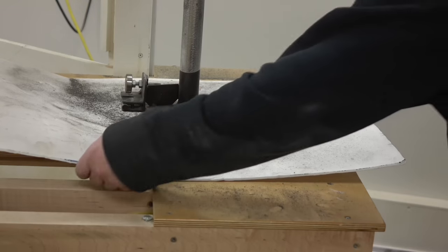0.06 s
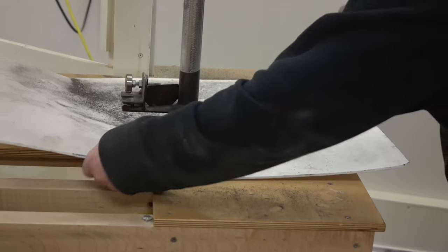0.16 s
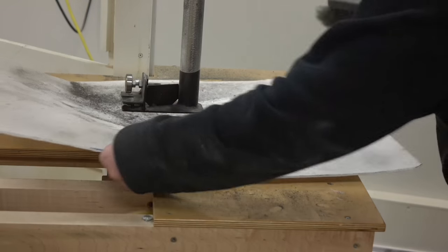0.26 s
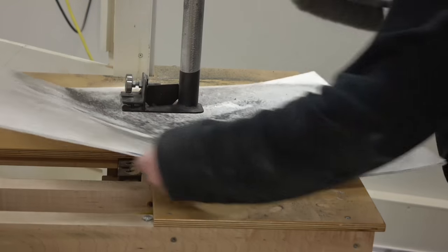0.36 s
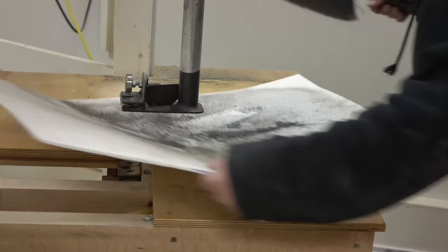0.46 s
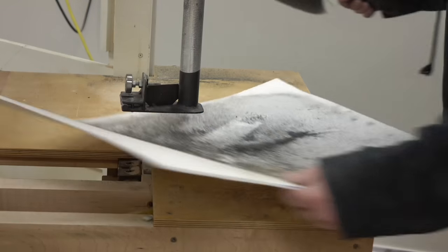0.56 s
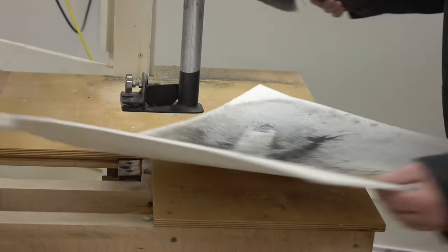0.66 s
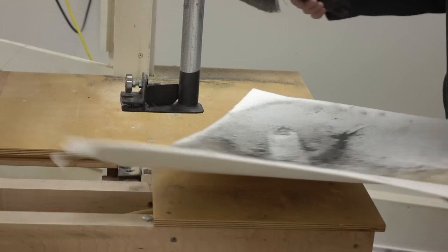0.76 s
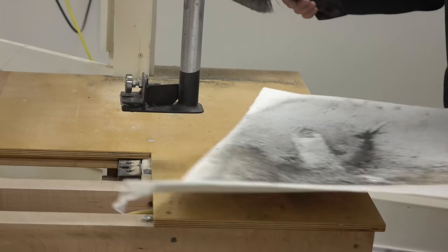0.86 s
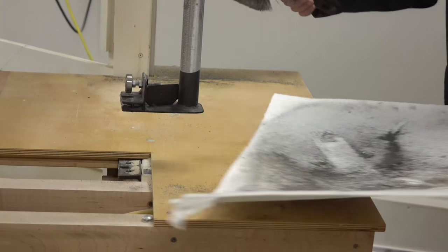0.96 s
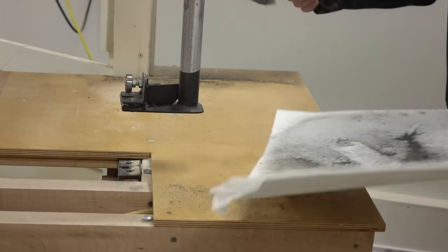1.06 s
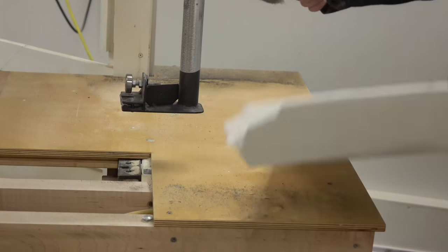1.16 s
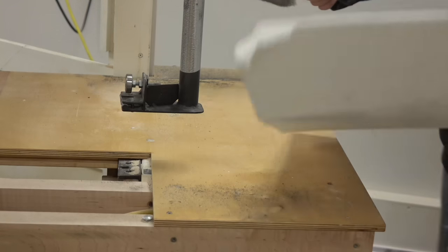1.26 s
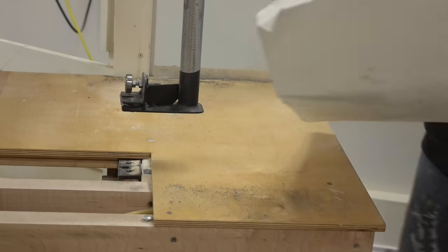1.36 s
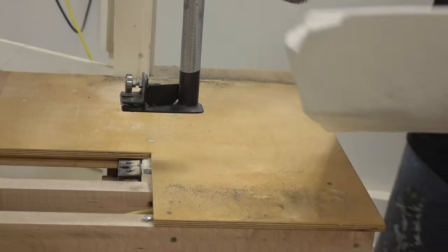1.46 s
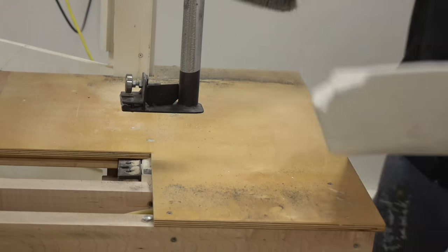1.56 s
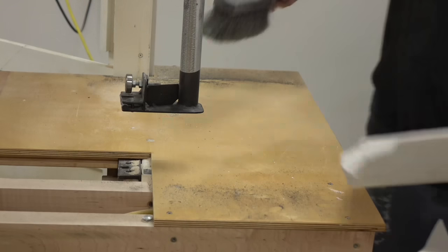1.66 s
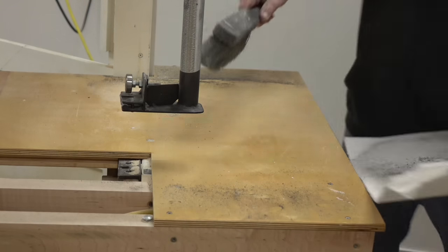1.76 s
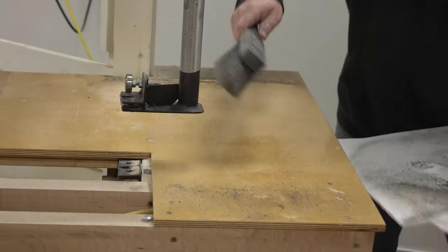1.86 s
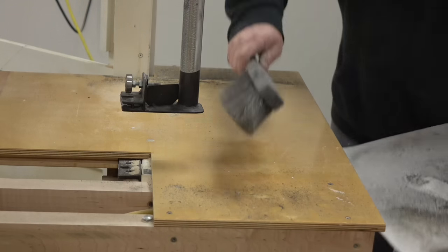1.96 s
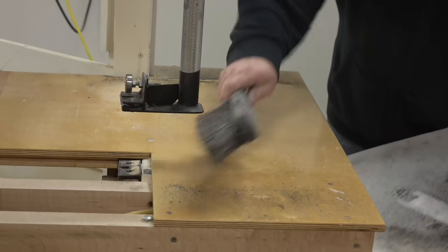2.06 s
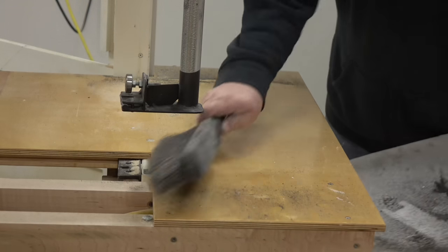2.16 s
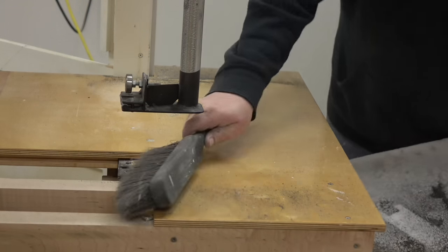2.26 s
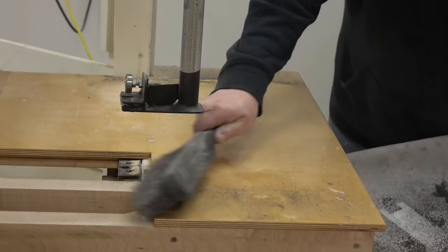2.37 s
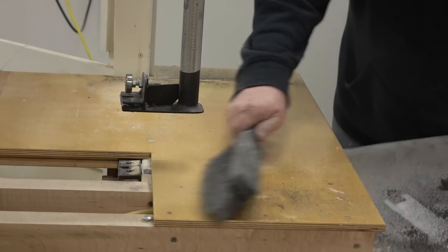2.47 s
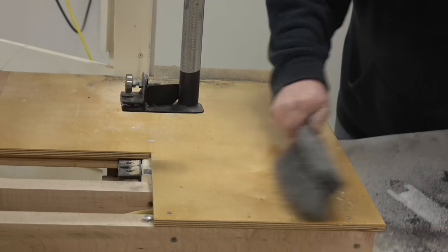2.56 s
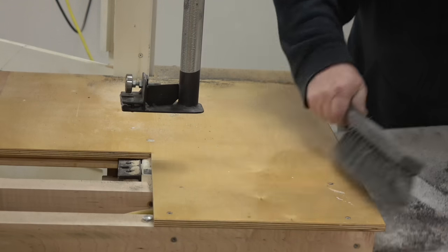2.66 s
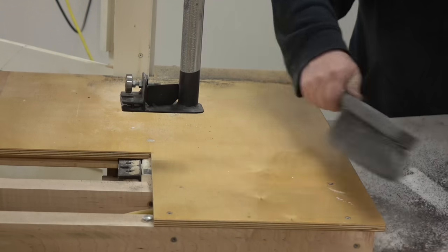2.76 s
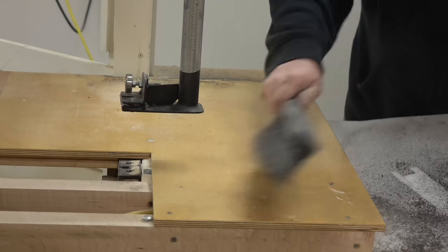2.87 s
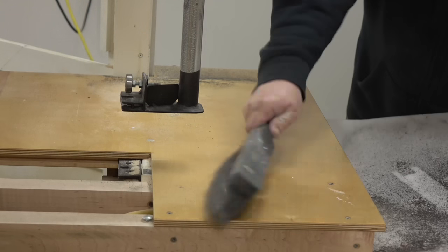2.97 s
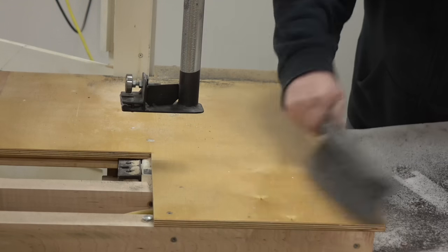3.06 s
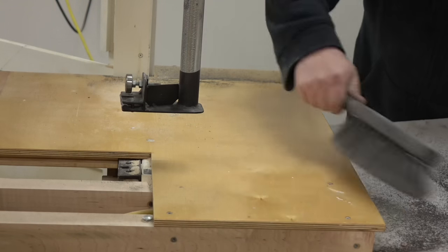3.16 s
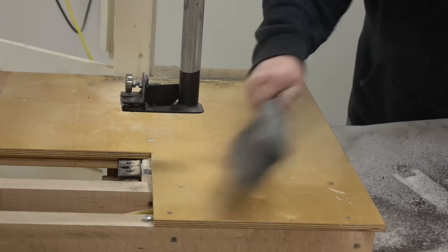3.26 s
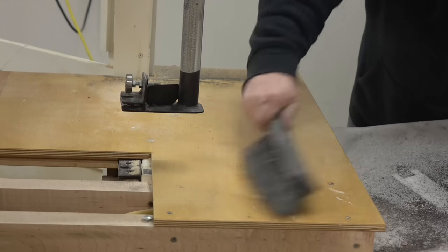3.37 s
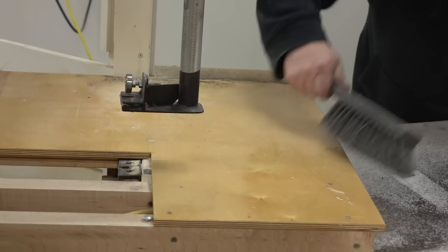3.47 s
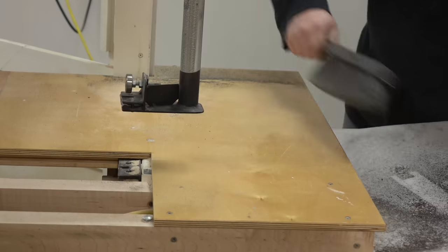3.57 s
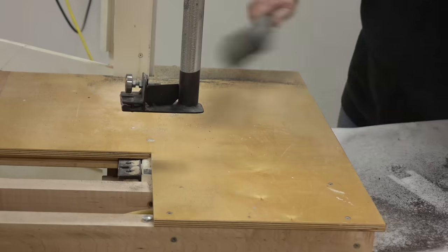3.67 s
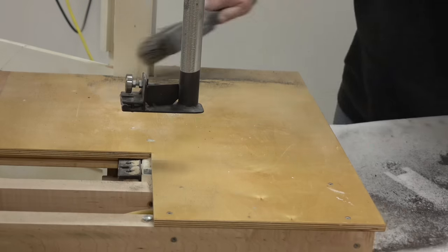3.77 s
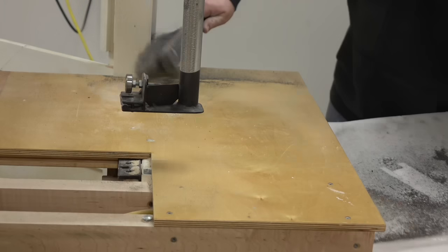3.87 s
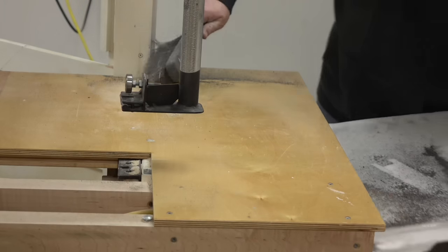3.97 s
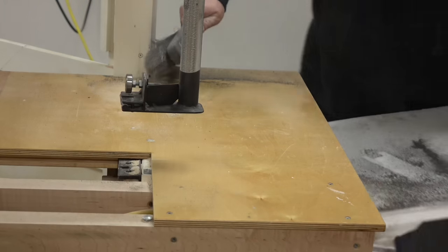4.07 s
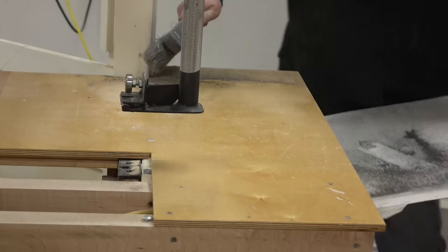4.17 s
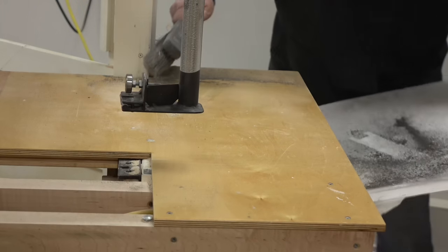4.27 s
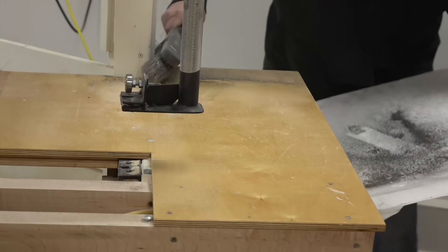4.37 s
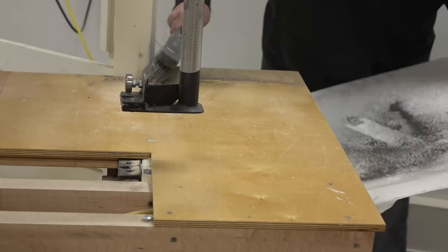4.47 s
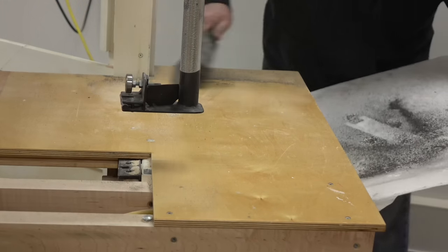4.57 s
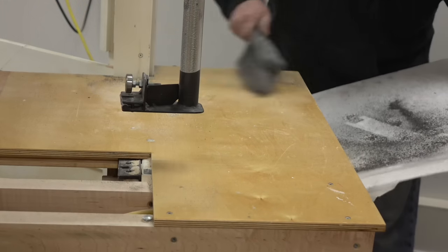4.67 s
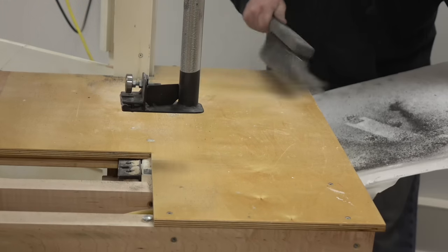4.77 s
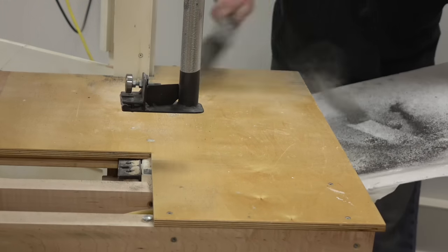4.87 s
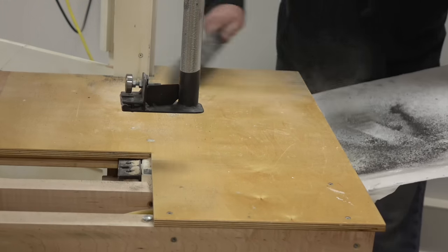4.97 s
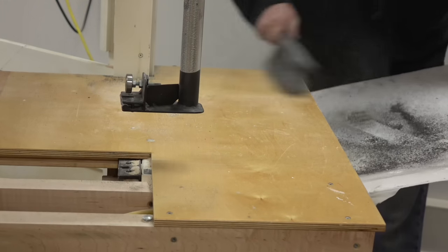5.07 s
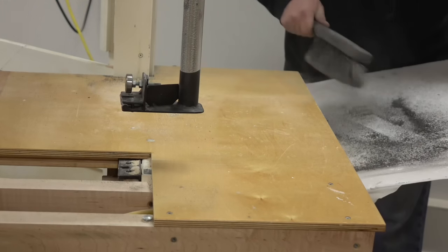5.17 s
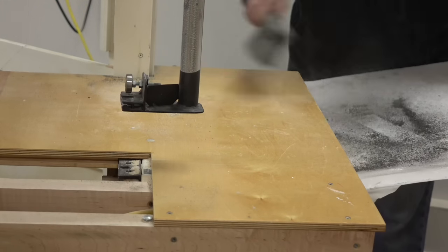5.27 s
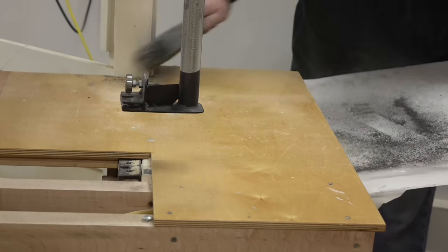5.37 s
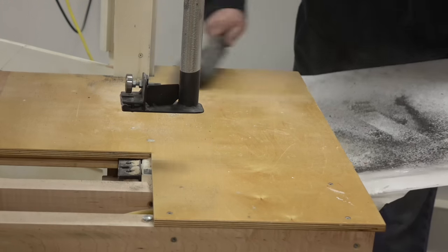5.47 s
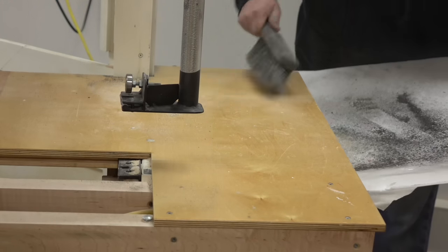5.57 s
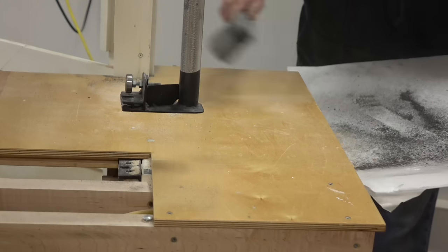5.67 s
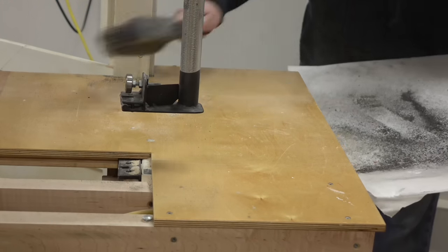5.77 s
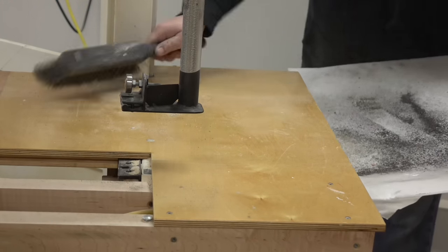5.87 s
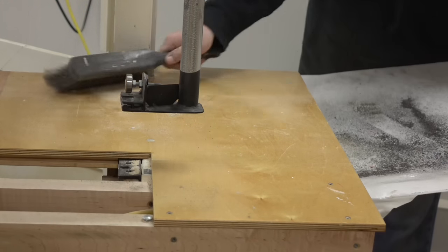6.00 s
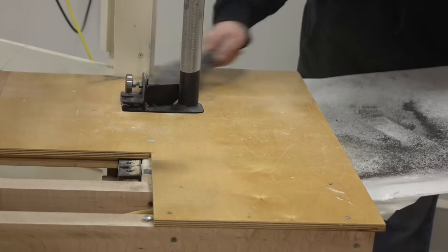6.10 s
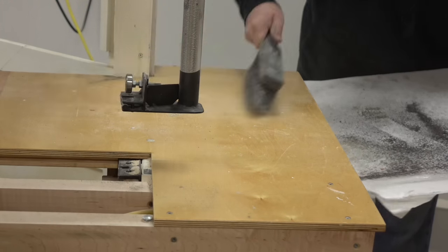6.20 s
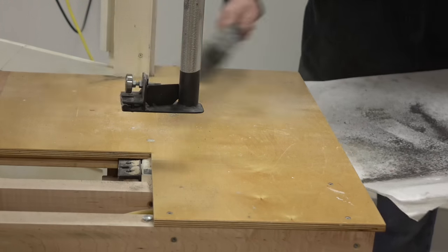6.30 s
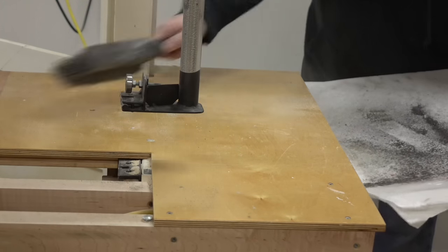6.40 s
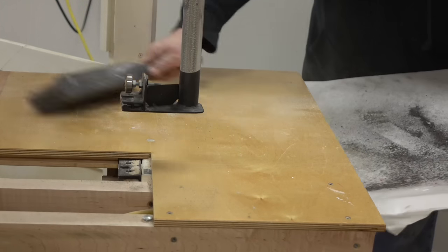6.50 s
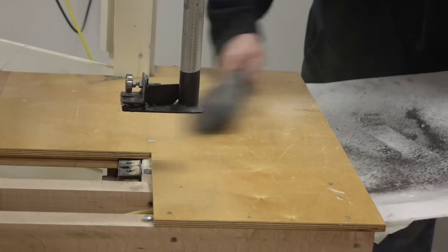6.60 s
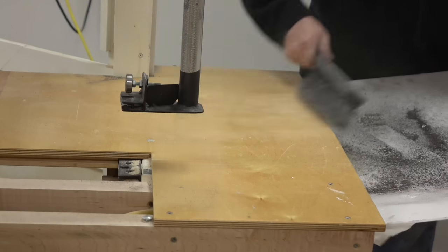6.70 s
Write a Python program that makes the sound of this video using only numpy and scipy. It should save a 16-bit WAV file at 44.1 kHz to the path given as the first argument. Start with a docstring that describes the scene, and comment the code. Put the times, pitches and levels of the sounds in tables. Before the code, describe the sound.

Heavy paper slides and flexes over gritty wood, its edge chattering and popping, with low floppy wobbles. After a brief faint hollow hiss and a loud rasp as it is put aside, a bristle brush lands with a dull knock and strokes the tabletop: airy swishes, scratchy scrapes, tiny grit clicks and wooden taps. Close centred pickup, little reverberation, quiet room air.

```python
"""A stiff charcoal drawing hisses, rasps and snaps as it is dragged off a wooden work table, flopping low.
It is laid aside under a faint hollow hiss; then a hand brush lands, sweeps dust and grit, and shakes the board.
Rubbing is random stick-slip impulses through spectra and wood modes, shaped by the force of each move.
Snaps and clicks are short filtered noise, flops are sagging notes with a rebound, scuffs are gliding noise bands.
A small workshop adds a short tail and quiet air; both channels are alike."""
import sys
import numpy as np
from scipy import signal
from scipy.fft import rfft, irfft, next_fast_len
from scipy.io import wavfile
from scipy.ndimage import uniform_filter1d, map_coordinates

SR = 44100
rng = np.random.default_rng(int(sys.argv[2]) if len(sys.argv) > 2 else 0)


def int16_out(signal):
    """Quantize to a 16-bit WAV file."""
    q = np.round(np.clip(np.atleast_2d(signal).T, -1, 1) * 32767)
    wavfile.write(sys.argv[1], SR, q.astype(np.int16))


N = 297234  # samples

# Levels in the tables are nominal: layer trims come on top.
# pulls of the sheet: start t/s, rise t/s, hold t/s, release t/s per 20 dB,
# hiss level/dB, rasp level/dB, drumming level/dB, treble offset level/dB
SHEET_PULLS = [ (0.009, 0.0074, 0.018, 0.07, -43, -49, -60.5, 1),
               (0.049, 0.0109, 0.0395, 0.21, -45.5, -46, -60.5, 3.5),
               (0.208, 0.0542, 0.143, 2.58, -41.5, -44, -62, 6.5),
               (0.45, 0.097, 0.226, 0.6557, -45, -44.5, -48, -4.5),
               (0.785, 0.0506, 0.0283, 0.1685, -40.5, -40.5, -51.5, 1.5),
               (0.971, 0.008, 0.012, 0.06, -50, -48, -75, -10),
               (1.011, 0.0652, 0.0578, 0.11, -35.5, -35.5, -41, -7),
               (1.269, 0.049, 0.0267, 0.11, -47.5, -53.5, -65.5, -22),
               (1.59, 0.035, 0.01, 0.05, -61, -66, -64, -8),
               (1.615, 0.0268, 0.057, 0.37, -49.5, -50, -47.5, -6),
               (1.727, 0.0457, 0.0132, 0.07, -46, -43.5, -41, 0),
               (1.909, 0.013, 0.046, 0.0066, -40, -42.5, -48.5, 1),
               (1.937, 0.0498, 0.0226, 0.1323, -32, -31, -38, -3.5)]
# pushes of the brush: start t/s, rise t/s, hold t/s, release t/s per 20 dB,
# bristle hiss level/dB, scrape level/dB, board level/dB, treble offset level/dB
BRUSH_PUSHES = [ (2.139, 0.0128, 0.1096, 0.4, -47.5, -52.5, -58, 1),
                (2.386, 0.025, 0.015, 0.35, -50, -50, -78, 0),
                (2.47, 0.074, 0.07, 0.24, -44.5, -46, -55.5, 1),
                (2.691, 0.012, 0.057, 0.1166, -52.5, -52, -48, 1),
                (2.782, 0.0204, 0.08, 0.62, -55, -66.5, -84.5, -3.5),
                (2.947, 0.0046, 0.167, 0.14, -51, -60, -73.5, 3),
                (3.321, 0.0064, 0.0445, 0.29, -49.5, -55.5, -83.5, 1),
                (3.56, 0.091, 0.02, 0.15, -58.5, -72, -68, -24),
                (3.655, 0.015, 0.012, 0.12, -61, -68, -68, -4),
                (3.81, 0.01355, 0.0178, 0.14, -49, -55, -78, 3.5),
                (3.91, 0.0475, 0.0102, 0.32, -47.5, -46.5, -60.5, 1),
                (3.97, 0.0153, 0.0292, 0.23, -44.5, -42.5, -58.5, 0.5),
                (4.04, 0.0402, 0.043, 0.11, -49, -58, -57.5, 9.5),
                (4.17, 0.041, 0.046, 1.5, -52, -54.5, -67, -2),
                (4.26, 0.0317, 0.1026, 0.08, -45.5, -49, -51.5, 2.5),
                (4.403, 0.022, 0.0441, 0.17, -38, -39, -38.5, -1.5),
                (4.553, 0.0608, 0.1203, 0.0358, -50.5, -53, -65, 2.5),
                (4.776, 0.004, 0.031, 0.75, -72.5, -57, -63.5, -12.5),
                (4.862, 0.05, 0.141, 0.25, -46.5, -50.5, -61.5, 0.5),
                (5.018, 0.0524, 0.097, 0.14, -46.5, -46.5, -51, -1.5),
                (5.15, 0.015, 0.0466, 0.13, -54.5, -44.5, -40, -8),
                (5.239, 0.0194, 0.019, 0.41, -59, -56.5, -50, -5),
                (5.347, 0.0607, 0.0093, 0.29, -46, -46.5, -44, 4.5),
                (5.459, 0.0355, 0.0668, 0.14, -44, -49, -46.5, 1.5),
                (5.66, 0.02, 0.012, 0.07, -55, -63, -53, 1),
                (5.798, 0.004, 0.125, 0.6, -58, -84.5, -82, -4),
                (5.897, 0.0092, 0.0253, 0.07, -46.5, -47.5, -61.5, 4),
                (5.955, 0.06, 0.19, 0.08, -50.5, -57, -84, 2),
                (6.349, 0.0037, 0.0697, 0.18, -57.5, -72, -70.5, -10.5),
                (6.457, 0.0073, 0.0085, 0.2, -47.5, -45, -51.5, 3),
                (6.541, 0.018, .16, 3.5, -48, -52.5, -60, 3)]
# the sheet's edge catches and snaps: t/s, peak level/dB, pitch f/Hz, t60 t/s
EDGE_CATCHES = [(0.032, -37, 838, 0.043), (0.075, -36.5, 790, 0.054), (0.101, -34, 2260, 0.044),
                (0.306, -33.5, 1353, 0.044), (0.408, -33, 1450, 0.051), (0.418, -31.5, 1450, 0.0266),
                (0.444, -33, 1250, 0.035), (0.475, -27.5, 1354, 0.0427), (0.490, -32, 1400, 0.057),
                (0.518, -31.5, 1270, 0.027), (0.532, -21, 1262, 0.015), (0.554, -22, 1205, 0.031),
                (0.558, -21.5, 1105, .03), (0.569, -25.5, 1420, 0.036), (0.584, -29, 2000, 0.035),
                (0.634, -23.5, 943, 0.047), (0.643, -26.5, 1050, 0.036), (0.706, -30, 980, 0.026),
                (0.738, -32.5, 900, 0.0242), (0.835, -29.5, 3880, 0.0275), (0.981, -38, 3800, 0.02),
                (1.0, -37, 2200, 0.014), (1.011, -36, 4500, 0.025), (1.017, -34, 1200, 0.04),
                (1.278, -40.5, 1640, 0.019), (1.636, -33, 701, 0.079)]
# the brush meets the table: t/s, level/dB, most excited f/Hz, ring level/dB, fall to -60 dB t/s
BRUSH_LANDINGS = [(2.236, -55, 1130, 4, 0.04), (2.696, -50, 1162, 6.5, 0.036), (2.947, -42, 1160, -8, 0.06),
                  (3.32, -41, 1233, -3.5, 0.05), (3.86, -50.5, 1130, 4.5, 0.0313),
                  (4.401, -41, 532, 7, 0.125), (4.937, -40.5, 1133, 1, 0.057), (5.404, -43, 588, 5, 0.035),
                  (5.904, -45, 766, 4, 0.075), (6.354, -53.5, 970, 11, 0.0186),
                  (6.459, -41.5, 1362, -3, 0.073)]
# grit and bristle tips click and scratch: t/s, peak level/dB, pitch f/Hz, t60 t/s
GRIT_TICKS = [(2.143, -37, 6000, .012), (2.396, -41, 1550, .012), (2.697, -38, 1400, .01),
              (2.7315, -29, 1600, 0.008), (2.876, -41.5, 3020, 0.0076), (3.035, -35.5, 4500, 0.0064),
              (3.127, -39, 2740, 0.0125), (3.238, -46.5, 3600, 0.006), (3.992, -33, 4000, 0.0055),
              (4.784, -39.5, 1500, 0.012), (4.802, -44, 1300, .012), (5.259, -40, 1110, 0.014),
              (5.349, -42.5, 2000, 0.0146), (5.407, -33, 2520, 0.0105), (5.479, -38.5, 1117, 0.0099),
              (5.8015, -43, 5200, 0.015), (6.354, -44.5, 3170, 0.034), (6.589, -32.5, 3970, 0.054)]
# dull flops of sheet and table: t/s, level/dB, starting pitch f/Hz, t60 t/s
PANEL_FLOPS = [(0.02, -50, 145, 0.122), (0.06, -52, 125, 0.2), (0.17, -53, 320, 0.15),
               (0.262, -46.5, 314.4, 0.29), (0.299, -41.5, 309.6, 0.198), (0.411, -46, 329, 0.165),
               (0.555, -41, 250, 0.08), (1.628, -41.5, 290.6, 0.103), (1.687, -47, 134, 0.083),
               (2.14, -44, 370, 0.12), (2.194, -36.5, 81.2, 0.077), (2.241, -22.5, 135, 0.04),
               (2.247, -32, 340, 0.12), (2.285, -32.5, 205, 0.0735), (2.301, -37.5, 93.4, 0.14),
               (2.32, -41, 300, 0.13), (2.386, -45, 130, 0.06), (2.42, -40.5, 322.7, 0.06),
               (2.484, -44, 330, 0.1), (2.696, -38, 400, 0.09), (2.7, -42, 165, 0.3),
               (2.733, -40, 400, 0.08), (3.665, -52, 330, 0.11), (4.265, -28, 136, 0.0704),
               (4.402, -19, 480, 0.028), (4.406, -34, 160, 0.08), (4.94, -40.5, 320, 0.16),
               (5.403, -38, 280, 0.067), (5.405, -42, 150, .08), (5.49, -42.5, 163.7, 0.125),
               (5.931, -54, 335.3, 0.26), (6.473, -39, 339.5, 0.155), (6.627, -39.5, 315, 0.179),
               (6.645, -38.5, 190, 0.19), (6.697, -45, 83.8, 0.143), (6.712, -46, 335, 0.16)]
# pitched scuffs of sheet or bristles: start t/s, length t/s, level/dB, from f/Hz, to f/Hz, width f/Hz
DRAG_SCUFFS = [(0.9995, 0.0055, -37, 3900, 3850, 600), (1.015, 0.012, -44, 2055, 1988, 400),
               (1.016, 0.012, -43, 4020, 4000, 500), (1.28, 0.15, -62, 500.1, 477.9, 80),
               (1.91, 0.0483, -44, 520.4, 660, 220), (1.955, 0.055, -41.5, 640, 700, 300),
               (2.517, 0.125, -55.5, 800, 770, 110), (2.515, 0.085, -54, 1000, 1080, 300),
               (2.53, 0.07, -56, 320, 345, 90), (2.664, 0.038, -51, 330, 357, 90),
               (3.095, 0.0594, -72, 1169, 1146, 80), (3.5, 0.19, -72, 325, 335, 70),
               (3.62, 0.07, -66, 1200, 1450, 500), (3.945, 0.031, -54, 750, 758, 200),
               (3.976, 0.0477, -49.5, 1304, 1100, 500), (3.979, 0.047, -47, 786.7, 505, 302),
               (4.018, 0.0226, -43.5, 310, 230.8, 161), (4.432, 0.058, -39.5, 590, 550, 240),
               (4.58, 0.17, -60, 620, 700, 400), (4.94, 0.05, -56, 600, 680, 350),
               (4.8, 0.144, -65, 721.2, 763, 220), (5.102, 0.0553, -50.5, 993.6, 1015, 250),
               (5.157, .075, -45, 1021, 920.7, 300), (5.165, 0.0465, -45, 477.4, 539, 262),
               (5.55, 0.17, -61, 700, 680, 120), (5.685, 0.045, -60, 340, 325, 90),
               (6.5, 0.051, -56.5, 797.7, 791.4, 80), (6.562, 0.018, -48, 6110, 6090, 400),
               (6.587, 0.052, -47.5, 3900, 4050, 500)]
# modes of table top and brush block: f/Hz, width f/Hz, level/dB
WOOD_MODES = [(326.6, 40, -2), (426, 61, 15), (555, 60, -4), (772.5, 43.5, 5.5), (927.2, 68, 3),
              (1143.5, 53.6, -2.5), (1243.4, 30.7, -4), (1416, 49, -2.5), (1557, 68.4, 1), (2270, 41, -35),
              (2750, 34, -8.5), (3450, 43, -20.5), (3760, 78, -18.5), (5000, 110, -11)]
# paper surface hissing over gritty wood: f/Hz, level/dB per Hz
PAPER_HISS_SPECTRUM = [(1200, -31.5), (2200, -1), (3500, -1.5), (4600, 0), (6000, 2.5), (7500, -3),
                       (10000, -13), (13000, -19), (15700, -37)]
# the paper's edge rasping: f/Hz, level/dB per Hz
PAPER_RASP_SPECTRUM = [(300, -37.5), (520, -13.5), (700, -1), (900, -1), (1400, -0.5), (1900, -4),
                       (3000, -12.5), (6000, -42)]
# paper crackling: f/Hz, level/dB per Hz
PAPER_CRACKLE_SPECTRUM = [(400, -34), (900, -4), (1500, -2), (3000, 0), (5500, -2.5), (8000, -12),
                          (15000, -39)]
# the whole sheet drumming: f/Hz, level/dB per Hz
PAPER_DRUM_SPECTRUM = [(60, -31.5), (140, -19), (190, -19), (250, -5), (320, 4), (420, 3), (560, -1),
                       (800, -25), (1500, -60.5)]
# bristle tips hissing: f/Hz, level/dB per Hz
BRISTLE_SPECTRUM = [(500, -48), (1300, -30.5), (2500, -6.5), (3600, -4.5), (4800, -1.5), (5900, 2),
                    (7000, -1.5), (8500, -8.5), (10000, -12), (12500, -18), (15700, -36)]
# bristles scraping: f/Hz, level/dB per Hz
SCRAPE_SPECTRUM = [(450, -51), (750, -14.5), (1000, -7.5), (1180, -1), (1500, 1), (1850, 1), (2300, 1),
                   (3000, -3), (4200, -5.5), (8000, -43)]
# the board shaken by the brush: f/Hz, level/dB per Hz
BOARD_SPECTRUM = [(50, -21), (130, -7), (220, -3.5), (325, 8), (410, -6), (510, -3.5), (650, 1.5),
                  (800, 1.5), (1000, 1), (1250, -6.5), (2000, -56)]
# quiet air of the room: f/Hz, level/dB per Hz
AIR_SPECTRUM = [(20, -20), (60, -1.5), (130, 0), (300, -7), (600, -15), (1100, -27.5), (1600, -19),
                (3000, -32.5), (6000, -10.5), (10000, -31), (15000, -63)]
# decay of the room: f/Hz, t60 t/s
ROOM_DECAY = [(150, 0.449), (1500, 0.25), (6000, 0.194), (14000, 0.0397)]
# hollow hiss while the sheet hangs in the air: f/Hz, width f/Hz, level/dB
HOLLOW_BANDS = [(1000, 900, -10), (1650, 160, 8.5), (2850, 240, 5), (4400, 380, 1), (6100, 800, -4),
                (2400, 2500, -10)]
# the sheet's edge chatters over the table: t/s, peak level/dB, pitch f/Hz
EDGE_CHATTER = [(0.24, -40, 1420), (0.3, -35, 1340), (0.38, -35.5, 1137), (0.46, -36, 1270),
                (0.52, -42, 1250), (0.58, -40, 1220), (0.68, -39.5, 984), (0.76, -41.5, 850)]
# bristles slapping down: f/Hz, level/dB per Hz
SLAP_SPECTRUM = [(700, -49.5), (1300, -14), (2400, 0), (3600, 1.5), (4800, 3.5), (6000, 0), (7500, -11.5),
                 (10000, -30.5), (15700, -36.5)]
# loose grit dragged by the bristles: f/Hz, level/dB per Hz
GRIT_SPECTRUM = [(300, -30), (800, -6), (1500, 0), (3000, -2), (6000, -4), (9000, -16), (15000, -40)]
# low shudders of the bench: start t/s, rise t/s, hold t/s, release t/s per 20 dB, level/dB
BENCH_RUMBLES = [(2.135, .015, .03, .06, -53), (2.3, .03, .02, .06, -55), (2.72, .03, .04, .08, -61),
                 (2.97, .03, .06, .08, -65), (4.01, .02, .03, .08, -57), (4.27, .015, .02, .06, -51),
                 (4.46, .03, .05, .06, -59), (5.83, .02, .04, .1, -68), (6.63, .03, .05, .15, -56)]
# bench shudder: f/Hz, level/dB per Hz
BENCH_SPECTRUM = [(30, -24), (60, -3), (100, -1), (140, 1), (190, -9), (300, -22), (600, -55)]

TOP_HZ = 15750  # band limit
# contact builds as a power of time, then eases from the end of the rise
RISE_POWER, SAG_DB_PER_S = 0.72, 9.5
# a flexed panel springs back, weaker, at the same note
REBOUND_S, REBOUND_LOSS_DB = .024, 13.5


def amp(db):
    """Decibels to gain."""
    return 10 ** (np.asarray(db) / 20)


def unit(x):
    """Scale to rms 1."""
    return x / np.sqrt(np.mean(x ** 2) + 1e-20)


def along(points, hz):
    """(Hz, value) points read on a log axis."""
    f, v = np.transpose(points)
    return np.interp(np.log(hz + 1), np.log(f + 1), v)


def add(track, s, sound):
    """Mix a sound into the track at s seconds."""
    part = track[max(round(s * SR), 0):][:len(sound)]
    part += sound[:len(part)]


def filtered(x, response):
    """Shape x with a response given as a function of frequency."""
    m = next_fast_len(len(x) + SR // 4)
    return irfft(rfft(x, m) * response(np.fft.rfftfreq(m, 1 / SR)), m)[:len(x)]


def resonance(f, hz, width_hz):
    """Causal response of one mode."""
    return 1j * f * width_hz / (hz * hz - f * f + 1j * f * width_hz)


def wobble(size, rate):
    """A smooth random curve with rate knots a second."""
    knots = rng.standard_normal(int(size * rate / SR) + 4)
    return map_coordinates(knots, [np.arange(size) * rate / SR])


def slips(size, rate, spread_db):
    """Tiny stick-slip impulses at random times; a wider spread lets a few stand out."""
    hit = rng.random(size) < rate / SR
    strength_db = spread_db * np.minimum(rng.exponential(size=size), 5)
    return hit * rng.choice([-1, 1], size) * amp(strength_db)


def shifting(x, depth_db, size, count):
    """As the contact moves, different bands stand out: patches size bands wide, count frames long."""
    z = signal.stft(x, nperseg=512)[2]
    field = uniform_filter1d(rng.standard_normal(z.shape), size=size, axis=0)
    field = uniform_filter1d(field, size=count, axis=1)
    return signal.istft(z * amp(depth_db * unit(field)), nperseg=512)[1][:len(x)]


def rub(spectrum, rate, spread_db, judder_db, judder_hz, shift_db, body=np.ones_like, size=2, count=14):
    """Steady friction: slips ring through a body and judder a little."""
    impulses = slips(N, rate, spread_db)
    grains = filtered(impulses, lambda f: amp(along(spectrum, f)) * body(f))
    grains = shifting(grains, shift_db, size, count)
    # level out slow swings, so the hand's pressure alone sets them
    grains /= np.sqrt(np.abs(uniform_filter1d(grains ** 2, size=SR // 12)) + 1e-12)
    return grains * unit(amp(judder_db * wobble(N, judder_hz)))


def effort(moves, levels_db, steepness):
    """Gain of moves that rise, hold and let go; steepness scales each rise and fall in dB."""
    power, t = np.zeros(N), np.arange(SR) / SR
    for (s, rise, hold, release, *_), db in zip(moves, levels_db):
        sag_db = SAG_DB_PER_S * np.maximum(t - rise, 0)
        release_db = 20 * np.maximum(t - rise - hold, 0) / release
        contact = np.minimum(t / rise, 1) ** RISE_POWER * amp(-sag_db - release_db)
        add(power, s, (amp(db) * contact ** steepness) ** 2)
    return np.sqrt(power)


def hissing(hiss, moves, hiss_db, top_offset_db, top_steepness):
    """Hiss of the moves; its top, from about 9 kHz, has its own level per move and a steeper rise and fall."""
    top = filtered(hiss, lambda f: 1 - 1 / (1 + (f / 9000) ** 8))
    lower = (hiss - top) * effort(moves, hiss_db, steepness=0.993)
    return lower + top * effort(moves, hiss_db + top_offset_db, top_steepness)


def burst(t, t60, attack):
    """A crowd of contacts that swells quickly and dies away."""
    return amp(-60 * t / t60) * (1 - np.exp(-t / attack))


def snaps(rows, width):
    """Short noise bursts ring around their own pitch; width is a share of that pitch."""
    out, t = np.zeros(N), np.arange(SR // 6) / SR
    for s, db, hz, t60 in rows:
        def colour(f):
            """A narrow and a broad mode, dulled above 6 kHz."""
            return resonance(f, hz, width * hz) * resonance(f, hz, 4.1 * hz) / (1 + 1j * f / 6000) ** 2
        snap = filtered(rng.standard_normal(len(t)) * burst(t, t60, 0.000294), colour)
        add(out, s, amp(db) * snap / np.abs(snap).max())
    return out


def wood(f):
    """The table's modes stand out above the direct sound."""
    modes = sum(amp(db) * resonance(f, hz, width_hz) for hz, width_hz, db in WOOD_MODES)
    return 2.67 + modes


def room_air():
    """Quiet steady noise of the room."""
    return amp(-69.2) * unit(filtered(rng.standard_normal(N), lambda f: amp(along(AIR_SPECTRUM, f))))


def workshop(x):
    """The small room's short tail: noise whose bands decay at their own rates, 5 ms late."""
    hz, t, z = signal.stft(rng.standard_normal(SR // 3), SR, nperseg=256)
    decay = amp(-60 * t / along(ROOM_DECAY, hz)[:, None])
    tail = signal.istft(z * decay, SR, nperseg=256)[1]
    return signal.fftconvolve(x, np.pad(tail / np.linalg.norm(tail), (SR // 200, 0)))[:N]


def sheet():
    """Paper hisses and crackles over gritty wood; its edge rasps and the whole sheet drums."""
    *_, hiss_db, rasp_db, drum_db, top_offset_db = np.transpose(SHEET_PULLS)
    hiss = rub(PAPER_HISS_SPECTRUM, rate=9000, spread_db=1.5, judder_db=0.51, judder_hz=91.5,
               shift_db=2.3, size=3, count=8)
    rasp = rub(PAPER_RASP_SPECTRUM, rate=2000, spread_db=0.0, judder_db=1.27, judder_hz=109.8,
               shift_db=3.0, count=6)
    drum = rub(PAPER_DRUM_SPECTRUM, rate=900, spread_db=2.5, judder_db=2.5, judder_hz=40.02,
               shift_db=2.5, count=8)
    crackle = rub(PAPER_CRACKLE_SPECTRUM, rate=700, spread_db=2.5, judder_db=1.5, judder_hz=59,
                  shift_db=4.5, size=6, count=2)
    edge = amp(-2.5) * rasp + amp(-11.0) * crackle
    return (hissing(hiss, SHEET_PULLS, hiss_db, top_offset_db, top_steepness=1.54)
            + edge * effort(SHEET_PULLS, rasp_db, steepness=1.2)
            + amp(-5.5) * drum * effort(SHEET_PULLS, drum_db, steepness=1.0))


def flop(db, hz, t60):
    """A wide panel flexes: a low note that sags in pitch as it dies, over a dull shudder."""
    t = np.arange(SR // 3) / SR
    sag = 0.11 * (1 - np.exp(-t / 0.0358))
    pitch = hz * (1 - sag + 0.0644 * wobble(len(t), 129))
    note = amp(3.0 * wobble(len(t), 147.2)) * np.sin(2 * np.pi * np.cumsum(pitch) / SR)
    shudder = unit(filtered(rng.standard_normal(len(t)), lambda f: resonance(f, 0.86 * hz, hz) ** 3))
    decay = burst(t, t60, 0.00351)
    sound = (note + amp(-19.0) * shudder) * decay
    # the energy follows the decay curve alone
    return amp(db - 1.5) * sound * np.linalg.norm(decay) / np.linalg.norm(sound)


def flops():
    """Every flop is followed by its weaker rebound."""
    out = np.zeros(N)
    for s, db, hz, t60 in PANEL_FLOPS:
        add(out, s, flop(db, hz, t60))
        add(out, s + REBOUND_S, flop(db - REBOUND_LOSS_DB, hz, t60))
    return out


def catches():
    """The paper's edge sticks and lets go with a short, pitched snap."""
    return snaps(EDGE_CATCHES, width=.3)


def chatter():
    """The dragged edge sticks and slips about sixty times a second, unevenly."""
    s, db, hz = np.transpose(EDGE_CHATTER)
    gap, strength_db, detune = (rng.standard_normal((60, 3)) * [.35, 1.5, .1]).T
    times = s[0] + np.cumsum(.016 * np.exp(gap))
    levels_db = np.interp(times, s, db) + strength_db
    pitches = np.interp(times, s, hz) * np.exp(detune)
    rows = np.transpose([times, levels_db, pitches, np.full(len(times), .03)])  # t60 30 ms
    return snaps(rows[times < s[-1]], width=0.24)


def scuffs():
    """Under extra drag the friction gathers into one rough band that glides as the contact moves."""
    out, t = np.zeros(N), np.arange(SR // 5) / SR
    for s, length, db, from_hz, to_hz, width_hz in DRAG_SCUFFS:
        u = np.minimum(t / length, 1)
        phase = 2 * np.pi * np.cumsum(from_hz * (to_hz / from_hz) ** u) / SR
        # two slow noises on a gliding carrier make the band
        a, b = (filtered(noise, lambda f: 1 / (1 + (2 * f / width_hz) ** 4))
                for noise in rng.standard_normal((2, len(t))))
        arch = np.sqrt(4 * u * (1 - u))
        band = (a * np.cos(phase) + b * np.sin(phase)) * arch
        add(out, s, amp(db) * unit(band[u < 1]))
    return out


def hollow_hiss():
    """A faint hollow hiss, each band flickering on its own, lingers as the sheet is carried aside."""
    bands = np.zeros(N)
    for hz, width_hz, db in HOLLOW_BANDS:
        band = filtered(rng.standard_normal(N), lambda f: amp(db) * resonance(f, hz, width_hz) ** 2)
        bands += band * amp(2.8 * wobble(N, 45.28))
    fade = np.interp(np.arange(N) / SR, [1.3, 1.42, 1.63, 1.7], [0, 1, 1, 0])
    return amp(-66.8) * unit(bands) * fade


def rumble():
    """A faint low shudder of the bench at a few typed moments."""
    shudder = rub(BENCH_SPECTRUM, rate=900, spread_db=1.5, judder_db=1.5, judder_hz=25, shift_db=1.5)
    return shudder * effort(BENCH_RUMBLES, np.transpose(BENCH_RUMBLES)[-1], steepness=1.0)


def brush():
    """Bristle tips hiss in a dense crowd of slips, scrape along the wood and shake the board."""
    *_, hiss_db, scrape_db, board_db, top_offset_db = np.transpose(BRUSH_PUSHES)
    hiss = rub(BRISTLE_SPECTRUM, rate=12000, spread_db=1.74, judder_db=.5, judder_hz=68.65, shift_db=3.0)
    scrape = rub(SCRAPE_SPECTRUM, rate=3000, spread_db=2, judder_db=0.97, judder_hz=80.77,
                 shift_db=3.0, body=lambda f: wood(f) + 0.54, count=10)
    board = rub(BOARD_SPECTRUM, rate=2600, spread_db=1.8, judder_db=0.8, judder_hz=59.0,
                shift_db=3.0, body=wood)
    return (hissing(hiss, BRUSH_PUSHES, hiss_db, top_offset_db, top_steepness=1.39)
            + amp(-1.6) * scrape * effort(BRUSH_PUSHES, scrape_db, steepness=1.293)
            + amp(-.5) * board * effort(BRUSH_PUSHES, board_db, steepness=1.615))


def grit():
    """Under the scraping tuft single grains catch and roll, in uneven clumps."""
    *_, scrape_db, _, _ = np.transpose(BRUSH_PUSHES)
    grains = rub(GRIT_SPECTRUM, rate=260, spread_db=3, judder_db=3, judder_hz=30,
                 shift_db=4, body=wood, size=4, count=3)
    return amp(-13.0) * grains * effort(BRUSH_PUSHES, scrape_db, steepness=1.0)


def ticks():
    """Single bits of grit and stray bristles click on the top."""
    return snaps(GRIT_TICKS, width=.45)


def landings():
    """The bristles slap down; the place of the blow decides which modes of the wood answer most."""
    out, t = np.zeros(N), np.arange(SR // 3) / SR
    for s, db, pitch_hz, ring_db, duration in BRUSH_LANDINGS:
        slap = unit(filtered(rng.standard_normal(len(t)), lambda f: amp(along(SLAP_SPECTRUM, f))))
        ring = np.zeros(len(t))
        for hz, width_hz, mode_db in WOOD_MODES:
            share = .18 * (hz > pitch_hz) + np.exp(-(np.log2(hz / pitch_hz) / 0.116) ** 2)
            jostle = 0.97 * wobble(len(t), 2 * width_hz)  # the bristles keep jostling the mode
            phase = 2 * np.pi * (hz * t + rng.random()) + jostle
            ring += share * amp(mode_db) * np.sin(phase)
        # bristles keep arriving for a while, then the pressed tuft damps the wood
        swell = amp(-60 * (t / duration) ** 2) * (1 - np.exp(-t / .0025))
        add(out, s, amp(db - 1.5) * swell * (slap + amp(ring_db) * unit(ring)))
    return out


def scene():
    """Sheet, brush and knocks over the quiet air of the room, alike in both channels."""
    rubbing = sheet() + brush() + grit()
    knocks = catches() + chatter() + scuffs() + ticks() + landings()
    thuds = flops() + rumble()
    room = workshop(amp(-14.5) * rubbing + amp(-11.0) * knocks + amp(-14.0) * thuds)
    mono = rubbing + knocks + thuds + room + hollow_hiss() + room_air()
    return np.array([mono, mono])


def record(dry):
    """Nothing is kept above the band limit."""
    return np.array([filtered(channel, lambda f: f < TOP_HZ) for channel in dry])


dry = scene()
out = record(dry)
int16_out(out)
```